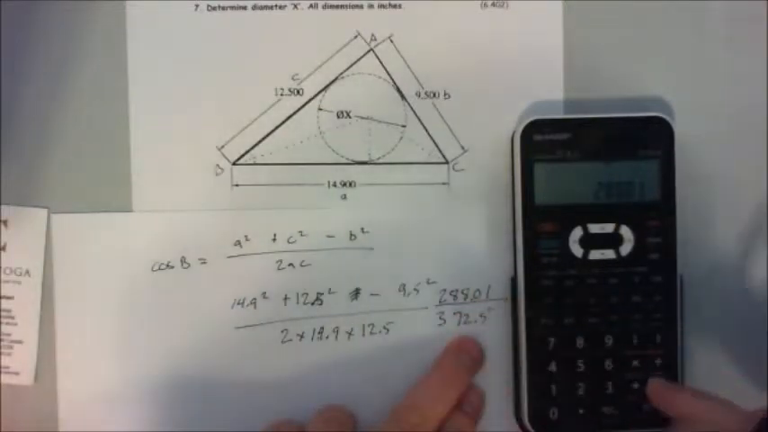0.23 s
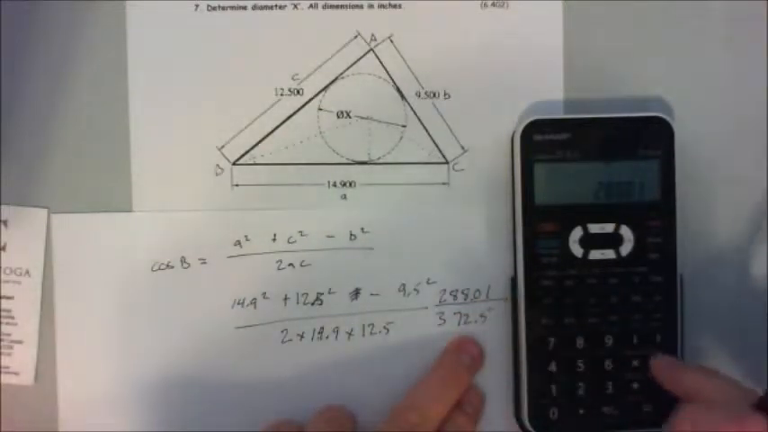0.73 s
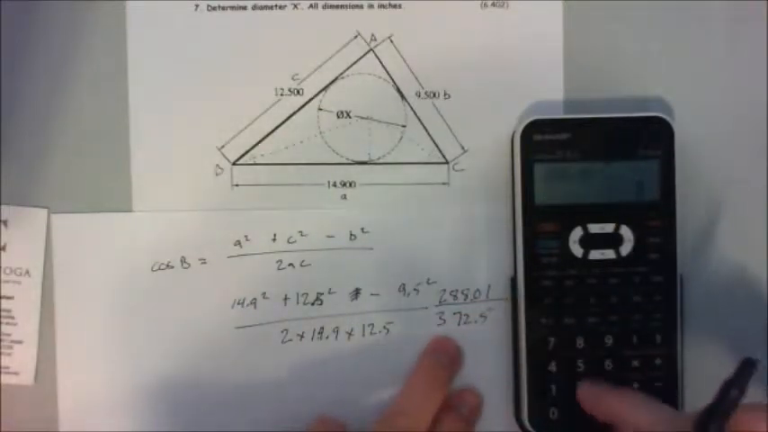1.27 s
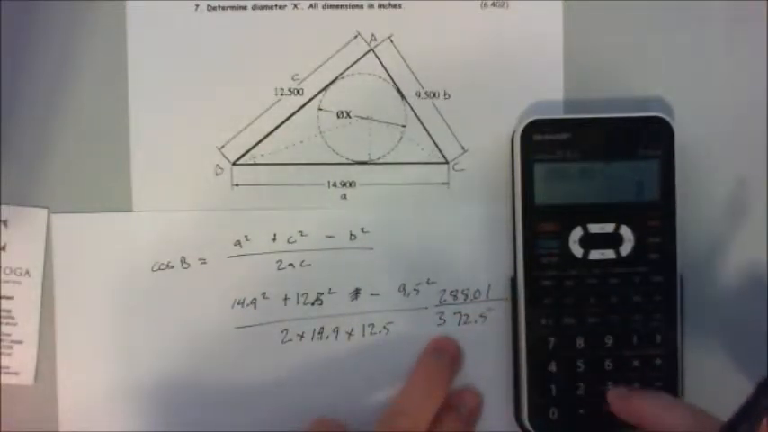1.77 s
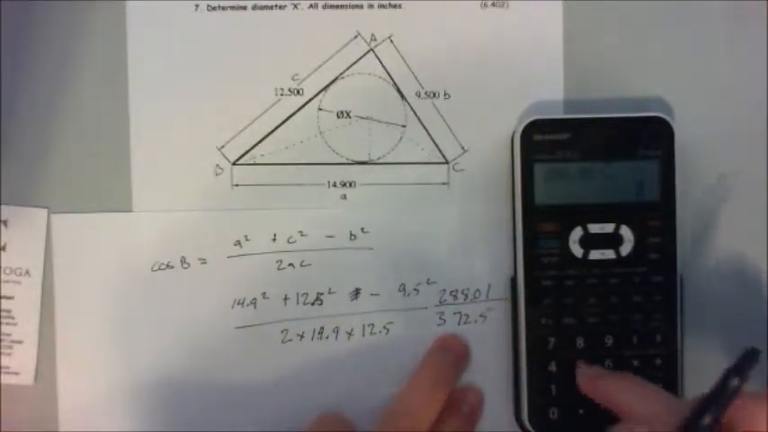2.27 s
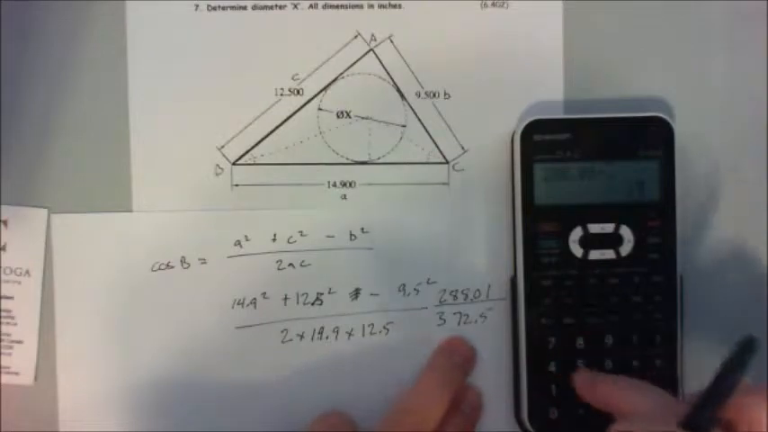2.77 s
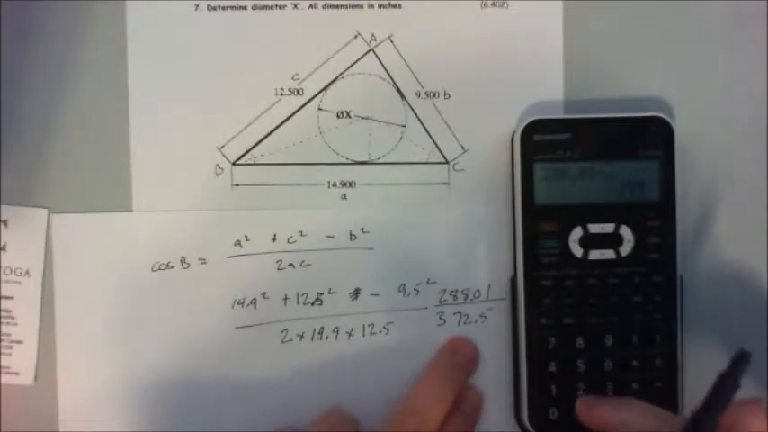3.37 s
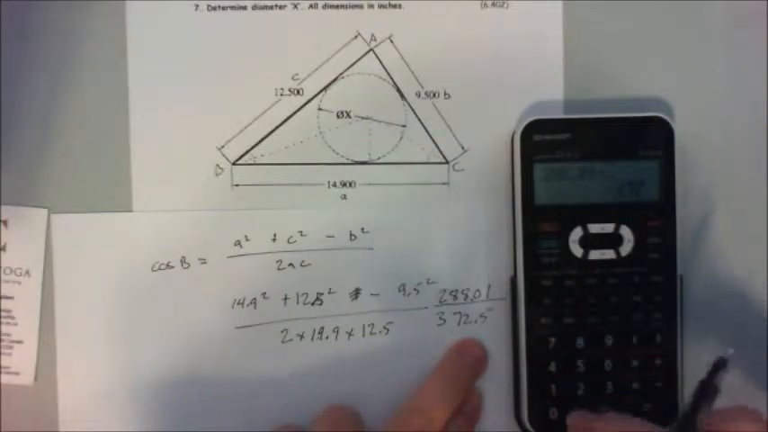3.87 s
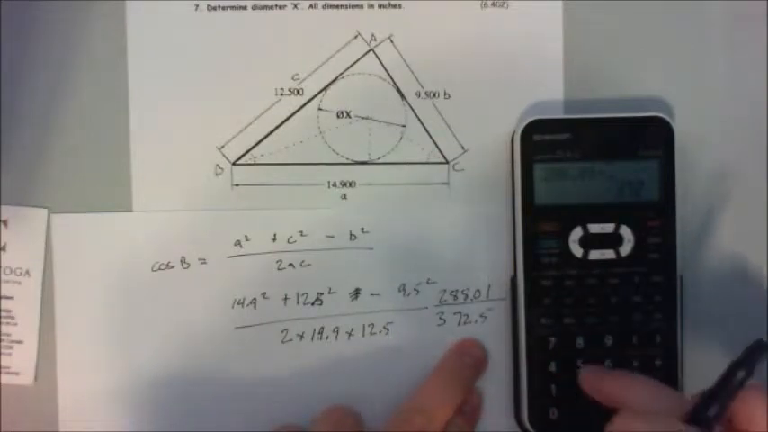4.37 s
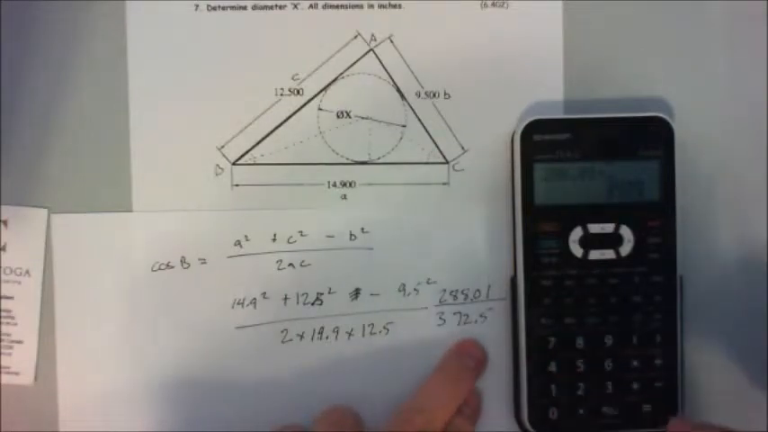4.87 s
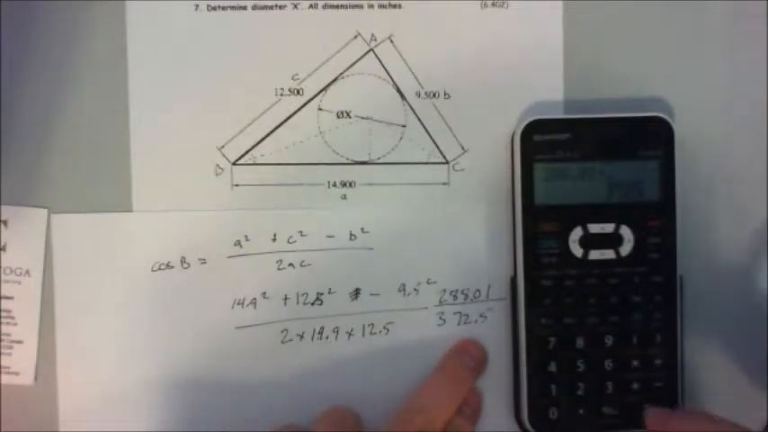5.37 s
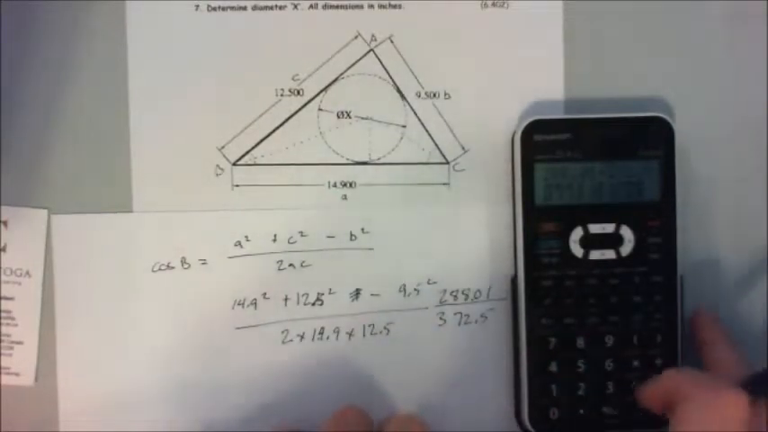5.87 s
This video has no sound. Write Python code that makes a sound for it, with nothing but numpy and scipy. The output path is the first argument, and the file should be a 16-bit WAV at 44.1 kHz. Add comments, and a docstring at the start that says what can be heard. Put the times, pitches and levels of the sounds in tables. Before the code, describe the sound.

Close on a desk, plastic calculator keys snap down with short rattly clicks and low woody thuds carried through the desk and microphone stand. The first is soft and thumpy; after more than a second a run of firmer presses follows, with duller key returns and faint hand brushes between. Steady low rumble, unsteady hum and faint hiss lie beneath. Light scuffs and bumps finish it.

```python
"""Calculator keys are pressed on a desk in a quiet room, the microphone standing on the same desk.
Each contact is a short burst of noise ringing the plastic case, with a noisy rattle after it.
It also thuds through the desk and microphone stand, made of low ringing tones.
A hand bumps and brushes about, as grainy noise that fades after each touch or swells with a slide.
Ventilation rumble, microphone hiss, a wavering low hum and two thin whines lie underneath."""
import sys
import numpy as np
from scipy import signal
from scipy.fft import rfft, irfft
from scipy.io import wavfile
from scipy.ndimage import uniform_filter1d

SR = 44100
rng = np.random.default_rng(int(sys.argv[2]) if len(sys.argv) > 2 else 0)


def rack_gain(trim_db):
    """Turn a fader trim in dB into the linear factor to multiply a signal by."""
    fader = np.asarray(trim_db, float)
    return 10 ** (fader / 20)


def dump(signal):
    """Clip the signal to [-1, 1] and save it as 16-bit WAV at the path in sys.argv[1]."""
    limited = np.clip(np.atleast_2d(signal).T, -1, 1)
    pcm = np.round(limited * 32767).astype(np.int16)
    wavfile.write(sys.argv[1], SR, pcm)


N = 269440   # length in samples


def rms_one(x):
    """Scale to rms 1."""
    return x / np.sqrt(np.mean(x ** 2) + 1e-20)


def ring(force, hz, t60):
    """A unit click sets a sine of about height 1 ringing; it falls by 60 dB in t60 seconds."""
    radius = rack_gain(-60 / (t60 * SR))
    angle = 2 * np.pi * hz / SR
    return signal.lfilter([0, np.sin(angle)], [1, -2 * radius * np.cos(angle), radius ** 2], force + 1e-18)


def coloured_noise(spectrum):
    """Noise of rms 1 whose strength per Hz follows the shape of a table."""
    hz = np.maximum(np.arange(N // 2 + 1) * SR / N, 1)
    points_hz, points_db = np.transpose(spectrum)
    level_db = np.interp(np.log(hz), np.log(points_hz), points_db)
    return rms_one(irfft(rfft(rng.standard_normal(N)) * rack_gain(level_db), N))


# colour of the ventilation rumble: f/Hz, level/dB (per Hz, shape only)
RUMBLE_COLOUR = [(8.8, -21), (15, 1), (20, -16.5), (27, -12.5), (43, -14.5), (65, -5.5), (77, -17.5),
                 (95, -27.5), (135, -19.5), (202, -28.5), (227, -26), (375, -36.5), (454, -31.5),
                 (551, -37), (1500, -43.5), (1950, -56), (3300, -120)]


def ventilation_rumble():
    """Steady noise, strongest in the bass, at -49 dB rms."""
    return rack_gain(-49) * coloured_noise(RUMBLE_COLOUR)


# colour of the microphone hiss: f/Hz, level/dB (per Hz, shape only)
MIC_HISS_COLOUR = [(880, -46), (1500, -14), (1660, -2), (2540, -2), (2880, -2.5), (6830, -5.5), (15100, -4),
                   (16000, -13)]


def microphone_hiss():
    """Steady bright noise at -66 dB rms."""
    return rack_gain(-66) * coloured_noise(MIC_HISS_COLOUR)


# the hum swells and sinks: t/s, level/dB
HUM_LEVEL = [(0.0, -39.5), (0.22, -55), (2.14, -47), (2.26, -63), (3.19, -46.5), (3.36, -48), (5.18, -54.5),
             (5.74, -43.5), (6.1, -55)]


def hum():
    """Noise through narrow low resonances at multiples of one motor speed, so that the hum wavers."""
    pitch_hz, width_hz = 58.96, 1.9
    t60 = np.log(1000) / (np.pi * width_hz)
    times, levels = np.transpose(HUM_LEVEL)
    level_db = np.interp(np.arange(N) / SR, times, levels)
    lines = []
    for multiple in (0.5, 1, 1.5):
        line = ring(rng.standard_normal(N + SR), pitch_hz * multiple, t60)
        lines.append(rms_one(line[SR:]))   # skip the first second, while the ringing builds up
    half, full, upper = lines
    # the two side lines keep a steady level, set against the mean hum
    sides = rack_gain(-6.5) * half + rack_gain(-11) * upper
    return rack_gain(level_db) * full + rack_gain(level_db.mean()) * sides


# electronic tones: f/Hz, level/dB (rms)
WHINE_TONES = [(13173, -86), (7998, -90)]


def whines():
    """Faint steady electronic tones, each a plain sine."""
    t = np.arange(N) / SR
    return sum(rack_gain(db) * np.sqrt(2) * np.sin(2 * np.pi * hz * t) for hz, db in WHINE_TONES)


# Contact rows below: t/s, click level/dB, treble tilt/dB, crackle/ms, desk level/dB, stand level/dB.
# Click and thud levels are relative.

# light ticks of fingertip, key caps and case: t/s, click level/dB, treble tilt/dB, crackle/ms
TICK_EVENTS = [(0.6331, -42, -2, 4.7), (0.6945, -55.5, 25.5, 3.5), (0.7218, -53.5, 6, 3.6),
               (0.8295, -47.5, -6, 1.7), (1.891, -52, 3, 3.9), (1.8986, -52, 2, 2),
               (1.9625, -48.5, 19.5, 2.9), (2.0859, -54, 16, 1.9), (2.4768, -49, -3, 5.5),
               (2.551, -44.5, 26, 3.7), (3.187, -47, -15, 2.8), (3.193, -49, 10, 1.7),
               (3.257, -46, -1, 2.8), (3.351, -56.5, 14, 2.2), (3.483, -54.5, 0, 2.8), (3.817, -39, 0, 4),
               (3.881, -36, -22, 4.4), (3.886, -40, 3, 0.5), (4.446, -51, -18, 4), (4.4565, -48, 5, 1.9),
               (4.4652, -25, -11.5, 1.46), (4.518, -49.5, 16, 3.2), (4.5309, -38.5, -5, 0.55),
               (5.2772, -38.5, 13, 12), (5.353, -38.5, -7, 2.3), (5.7855, -43, -20, 1.6),
               (5.826, -56, 16, 1.4), (5.9862, -36, -6, 1.6), (6.009, -38, -3, 2.8)]


def ticks():
    """Contact rows of the ticks, whose thuds are set 7 dB under their clicks."""
    return [(s, db, tilt, ms, db - 7, db - 7) for s, db, tilt, ms in TICK_EVENTS]


# a key snaps down: t/s, click level/dB, treble tilt/dB, desk level/dB, stand level/dB
PRESS_EVENTS = [(0.643, -36.5, -1, -37, -16.5), (1.901, -24, -5, -21, -21), (2.4846, -17, -7, -16.5, -26),
                (3.1956, -21, -3, -19.5, -24), (3.8213, -21.5, -4.5, -23, -43), (4.458, -25, -5, -18, -24),
                (5.2848, -15.5, -6, -14, -29)]


def presses():
    """Contact rows of the keys going down, each with a 2.58 ms crackle."""
    return [(s, db, tilt, 2.58, desk, stand) for s, db, tilt, desk, stand in PRESS_EVENTS]


# loose keys and nearby surfaces, a dense tail: f/Hz, level/dB (against the hit), t60/s
RATTLE_BANDS = [(643, -2, 0.2), (1340, -8, 0.11), (2310, -6.5, 0.13), (4300, -11, 0.14), (7440, -10, 0.11),
                (12300, -23, 0.054)]


def after_rattle(hit):
    """Loose keys and nearby surfaces answer in noise that takes a share of the hit's energy and dies away."""
    t = np.arange(SR // 5) / SR
    out = np.pad(hit, (0, len(t) - len(hit)))
    swell = 1 - np.exp(-(t / 0.0015) ** 2)
    for hz, level_db, t60 in RATTLE_BANDS:
        band = signal.butter(2, [hz / 1.3, hz * 1.3], "band", fs=SR, output="sos")
        noise = signal.sosfilt(band, rng.standard_normal(len(t)))
        dying = noise * rack_gain(-60 * t / t60) * swell
        energy = np.sum(signal.sosfilt(band, hit) ** 2)
        out += rack_gain(level_db) * rms_one(dying) * np.sqrt(energy / len(t))
    return out


# ringing of the plastic case: f/Hz, level/dB (relative), t60/s (held to 0.001-0.008 when played)
CASE_MODES = [(875, -10, 0.013), (1110, -12, 0.021), (1710, -73, 0.015), (2210, -11.5, 0.01),
              (2525, -5.5, 0.013), (2750, -17, 0.014), (3345, -8.5, 0.012), (4090, -11.5, 0.013),
              (4510, -5.5, 0.0051), (5140, -20.5, 0.012), (6130, -11.5, 0.0036), (6860, -13.5, 0.0054),
              (7600, -14.5, 0.009), (8850, -30, 0.003), (9400, -26, 0.0035), (12100, -18.5, 0.0022)]


def clicks(contacts, gain_db, pivot_hz, top_hz):
    """A few milliseconds of rough contact shake the heavily damped case modes, each time with fresh noise."""
    out, t = np.zeros(N + SR), np.arange(1500) / SR
    for s, click_db, tilt_db, crackle_ms, _, _ in contacts:
        tau = np.clip(crackle_ms, 0.6, 6) / 1000
        swell_and_fade = (t / tau) * np.exp(-t / tau * 2)
        rough = rng.standard_normal(len(t)) * swell_and_fade
        hit = 0
        for hz, level_db, t60 in CASE_MODES:
            bright = 1 / (1 + (pivot_hz / hz) ** 2)   # the tilt acts mostly on the upper modes
            gain = rack_gain(click_db + gain_db + level_db + bright * tilt_db)
            hit = hit + gain * rms_one(ring(rough, hz, np.clip(t60, 0.001, 0.008)))
        hit = after_rattle(hit)
        out[round(s * SR):][:len(hit)] += hit
    return signal.sosfilt(signal.butter(4, top_hz, fs=SR, output="sos"), out[:N])


# ringing of the desk: f/Hz, level/dB (relative), t60/s
DESK_MODES = [(66, -7, 0.19), (144.7, 0.5, 0.18), (184.7, -9.5, 0.2), (263.3, -4.5, 0.15), (340, -28, 0.28),
              (463, -7.5, 0.1), (496, -4, 0.012), (671.5, -9.5, 0.089), (810, -48, .025)]
# ringing of the microphone stand: f/Hz, level/dB (relative), t60/s
STAND_MODES = [(62, -12.5, 0.13), (91.4, -2, 0.097)]


def thuds(contacts, lag_ms, push_ms, scatter_db):
    """Contacts push desk and stand softly; neighbouring desk modes start in opposition, so the thud swells."""
    s, desk_db, stand_db = contacts[:, 0], contacts[:, -2], contacts[:, -1]
    at = np.round((s + lag_ms / 1000) * SR).astype(int)
    force, out = np.zeros(N), 0
    for hz, level_db, t60 in STAND_MODES:
        force[at] = rack_gain(stand_db + level_db)
        out = out + ring(force, hz, t60)
    chance = rng.normal(0, 1, (len(contacts), len(DESK_MODES)))
    for k, (hz, level_db, t60) in enumerate(DESK_MODES):
        force[at] = rack_gain(desk_db + level_db + scatter_db * chance[:, k])
        out += (-1) ** k * ring(force, hz, t60)
    soften = np.exp(-1000 / (push_ms * SR))   # turns each sharp push into a soft pulse
    return signal.lfilter([(1 - soften) ** 2], [1, -2 * soften, soften ** 2], out)


# the hand lands on desk, paper or case and scrapes briefly (relative levels):
# t/s, desk level/dB, stand level/dB, hiss level/dB, scuff level/dB
TOUCH_EVENTS = [(0.8299, -39, -65, -56, -43), (1.044, -30, -31, -67, -53), (1.06, -33, -47, -74, -56),
                (1.077, -38.5, -37, -77, -55), (1.111, -36.5, -41, -68, -65),
                (2.0852, -25, -22.5, -60, -42.5), (2.686, -36.5, -29, -54.5, -47),
                (2.768, -48.5, -53, -62, -49.5), (3.3515, -34, -27.5, -67, -46.5),
                (3.484, -41, -60, -74, -60), (5.512, -55, -60, -61, -57), (5.596, -47, -60, -72, -50.5),
                (5.686, -49, -57, -67, -66), (5.746, -23.5, -20.5, -45, -47), (5.764, -37, -35, -55, -44),
                (5.784, -23, -20, -51, -34.5), (5.808, -32, -34, -52, -55), (5.833, -34.5, -18.5, -72, -59),
                (5.851, -37, -27, -80, -54), (5.937, -35, -50, -62, -45), (5.966, -39, -33, -56, -52),
                (5.9847, -28, -31, -44.5, -34.5), (6.007, -39, -31.5, -70, -49)]


def touches():
    """Contact rows of the hand landing: a short bright click, set 6 dB under the hiss of the touch."""
    return [(s, hiss - 6, 8, 0.6, desk, stand) for s, desk, stand, hiss, _ in TOUCH_EVENTS]


def scrapes(level_db, fade_ms):
    """Strength of the scraping: each touch starts a scrape almost at once, which then fades."""
    starts = np.zeros(N)
    starts[np.round(np.array(TOUCH_EVENTS)[:, 0] * SR).astype(int)] = rack_gain(level_db)
    rise = np.exp(-1000 / (0.77 * SR))   # rises within 0.77 ms
    fade = np.exp(-1000 / (fade_ms * SR))
    return signal.lfilter([1 - rise], np.convolve([1, -rise], [1, -fade]), starts + 1e-18)


# the hand slides slowly over the paper: start t/s, length t/s, hiss level/dB, scuff level/dB
SLIDE_EVENTS = [(0.836, 0.33, -67, -63), (2.09, 0.08, -67.5, -73), (3.35, 0.1, -69, -71),
                (5.46, 0.21, -62, -57.5), (5.649, 0.28, -58, -60), (5.86, 0.33, -58.5, -51)]
# colour of the bright hiss: f/Hz, level/dB (per Hz, shape only)
BRUSH_HISS_COLOUR = [(880, -59), (1500, -5), (1910, -6), (2080, -9.5), (3270, -14.5), (3970, -10),
                     (4330, -6.5), (5000, -10), (5600, -10), (6800, -13), (8020, -12.5), (10800, -15),
                     (15000, -28)]
# colour of the dull scuff: f/Hz, level/dB (per Hz, shape only)
BRUSH_SCUFF_COLOUR = [(200, 4), (320, 1), (450, -3), (640, -7.5), (900, -9), (1400, -15), (2500, -50)]


def brush(lump_db, grain_db):
    """Skin catches and slips: noise in uneven lumps, a fine-grained hiss above and a dull scuff below."""
    t = np.arange(N) / SR
    *_, touch_hiss_db, touch_scuff_db = np.transpose(TOUCH_EVENTS)
    hiss = scrapes(touch_hiss_db, fade_ms=14.8)
    scuff = scrapes(touch_scuff_db, fade_ms=17.2)
    for s, length, hiss_db, scuff_db in SLIDE_EVENTS:
        speed = np.sin(np.pi * np.clip((t - s) / length, 0, 1))
        hiss = hiss + rack_gain(hiss_db) * speed
        scuff = scuff + rack_gain(scuff_db) * speed
    lumps = lump_db * rms_one(uniform_filter1d(rng.standard_normal((2, N)), size=350))
    grains = grain_db * rms_one(uniform_filter1d(rng.standard_normal(N), size=40))
    hiss_noise = rms_one(rack_gain(lumps[0] + grains) * coloured_noise(BRUSH_HISS_COLOUR))
    scuff_noise = rms_one(rack_gain(lumps[1]) * coloured_noise(BRUSH_SCUFF_COLOUR))
    return hiss * hiss_noise + scuff * scuff_noise


# the key springs back against its stop: t/s, click level/dB, treble tilt/dB, desk level/dB, stand level/dB
RELEASE_EVENTS = [(1.9751, -24, -29, -31.5, -22), (2.559, -25, -17.5, -26, -23.5),
                  (3.2489, -38.5, 0, -38.5, -31), (3.2657, -44, -6, -35.5, -52),
                  (3.8938, -23, -30, -28, -23.5), (4.5333, -23.5, -31, -29, -22.5),
                  (5.3245, -40, 4, -29.5, -29), (5.36, -37, -9.5, -32, -30)]


def releases():
    """Contact rows of the keys coming up; each bounces once, weaker and duller."""
    crackle_ms = 1.82
    bounce_s, bounce_db, bounce_tilt_db = 0.0118, -11.5, -16
    rows = []
    for s, db, tilt, desk, stand in RELEASE_EVENTS:
        rows.append((s, db, tilt, crackle_ms, desk, stand))
        rows.append((s + bounce_s, db + bounce_db, tilt + bounce_tilt_db, crackle_ms,
                     desk + bounce_db, stand + bounce_db))
    return rows


def scene():
    """Clicks come through the air; thuds reach the microphone through the desk and its stand."""
    air = ventilation_rumble() + microphone_hiss() + hum() + whines()
    hard = np.array(ticks() + presses() + releases())
    soft = np.array(touches())
    keys = clicks(np.concatenate([hard, soft]), gain_db=-16.5, pivot_hz=4440, top_hz=12500)
    desk = (thuds(hard, lag_ms=1.95, push_ms=0.46, scatter_db=2.0)
            + thuds(soft, lag_ms=1.2, push_ms=0.47, scatter_db=2.0))
    # the thuds carry little below 56 Hz
    desk = signal.sosfilt(signal.butter(2, 56, "high", fs=SR, output="sos"), desk)
    return (air + keys + desk + brush(lump_db=2.2, grain_db=0.5))[None]


def band_limit(x):
    """A steep low-pass at the top of the band."""
    return signal.sosfilt(signal.butter(12, 16650, fs=SR, output="sos"), x)


def record(dry):
    """The converter adds a small constant offset."""
    mix = dry - 0.0058
    return band_limit(mix)


dry = scene()
out = record(dry)
dump(out)
```